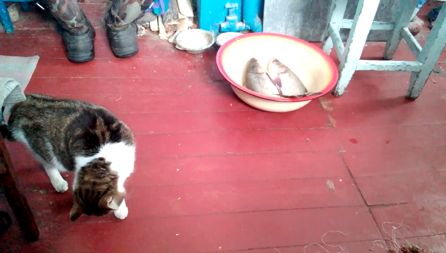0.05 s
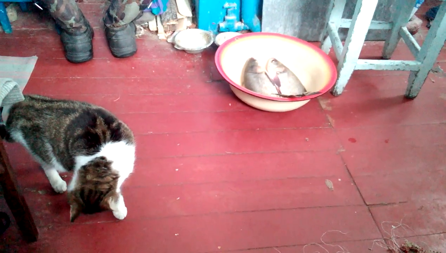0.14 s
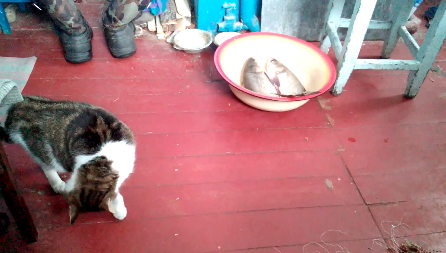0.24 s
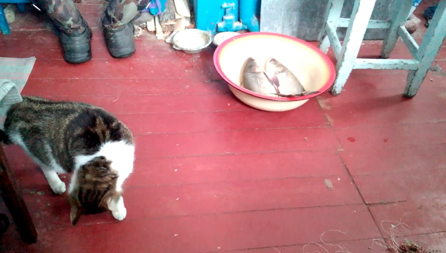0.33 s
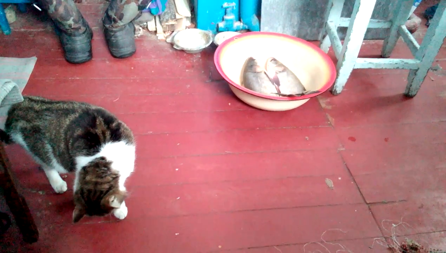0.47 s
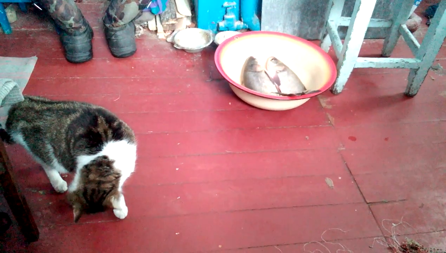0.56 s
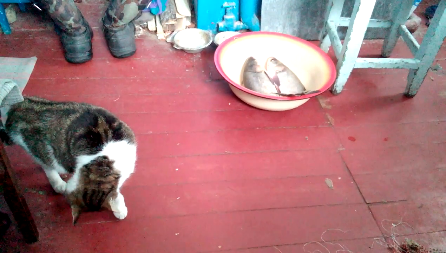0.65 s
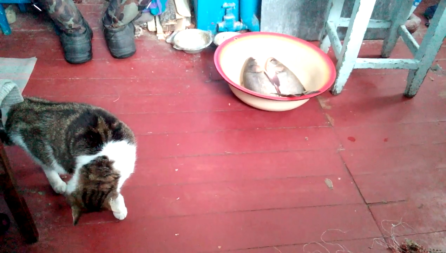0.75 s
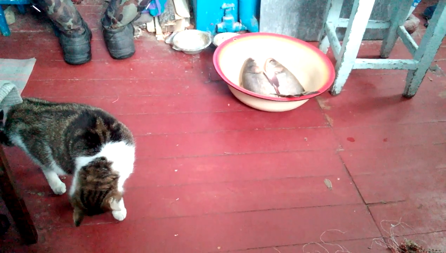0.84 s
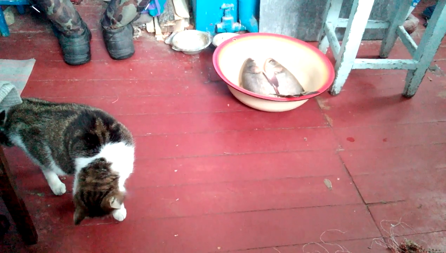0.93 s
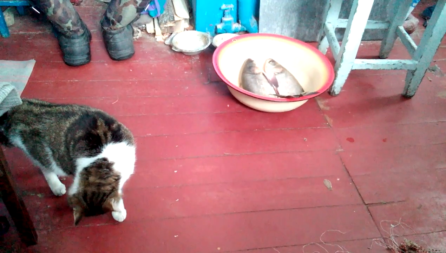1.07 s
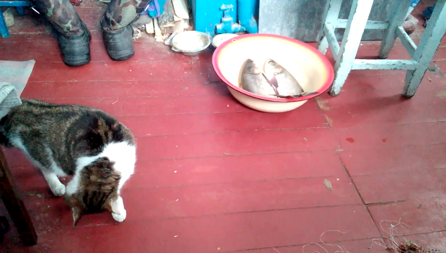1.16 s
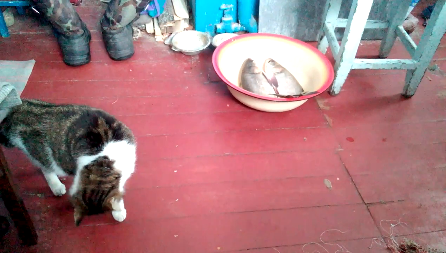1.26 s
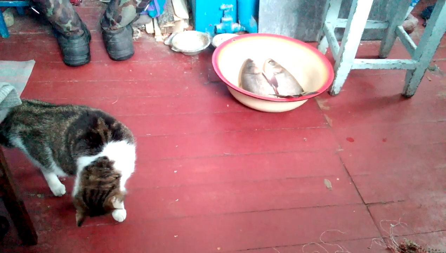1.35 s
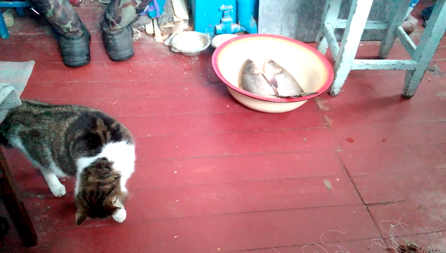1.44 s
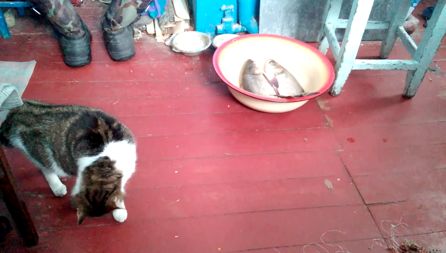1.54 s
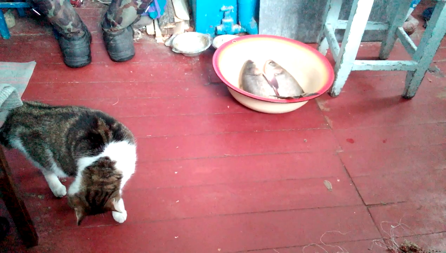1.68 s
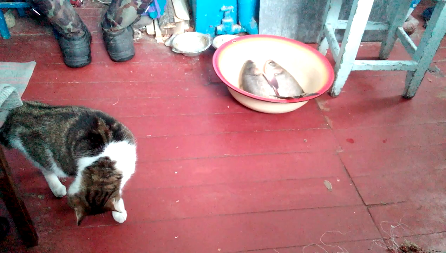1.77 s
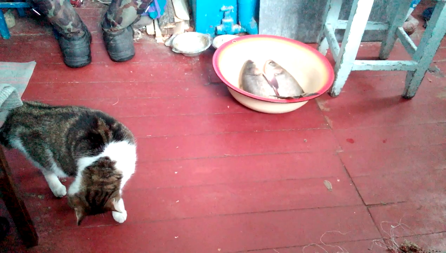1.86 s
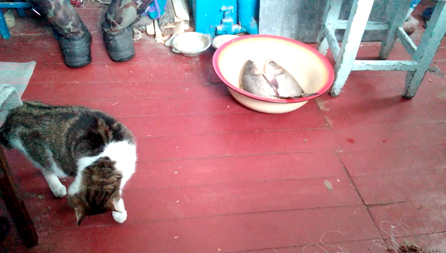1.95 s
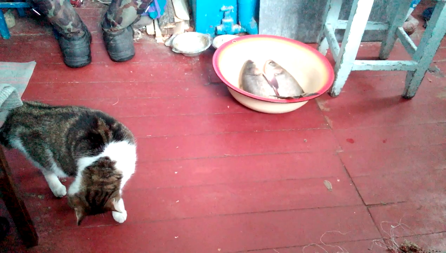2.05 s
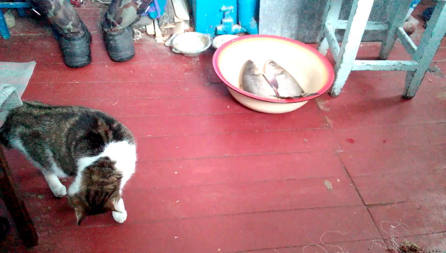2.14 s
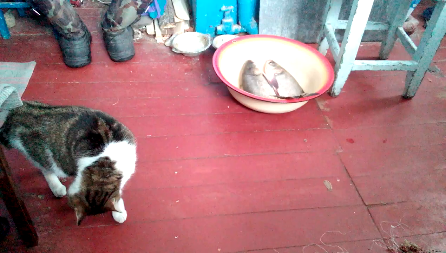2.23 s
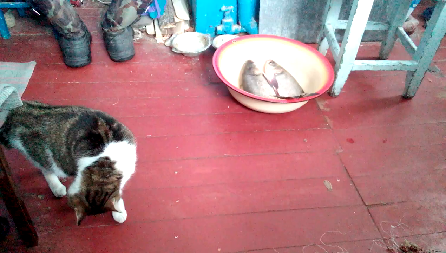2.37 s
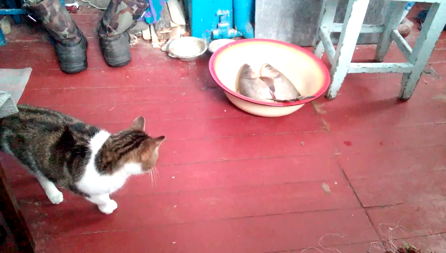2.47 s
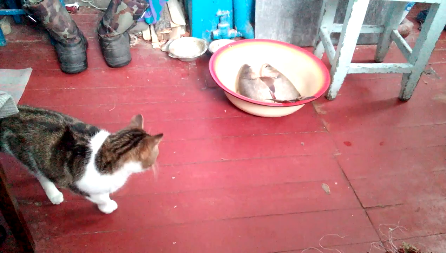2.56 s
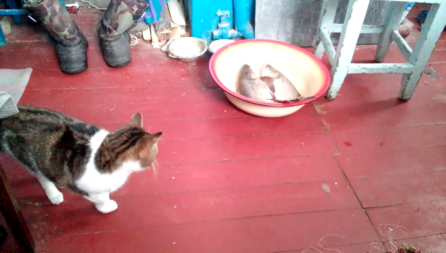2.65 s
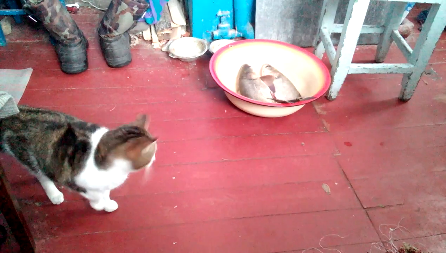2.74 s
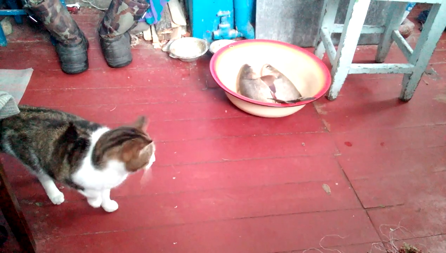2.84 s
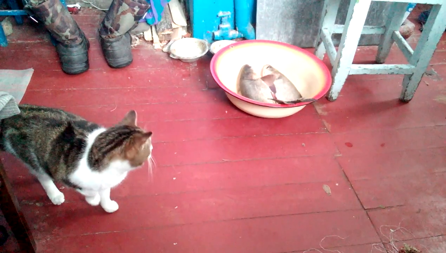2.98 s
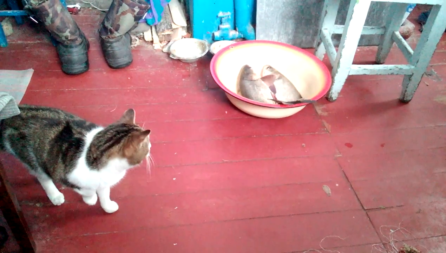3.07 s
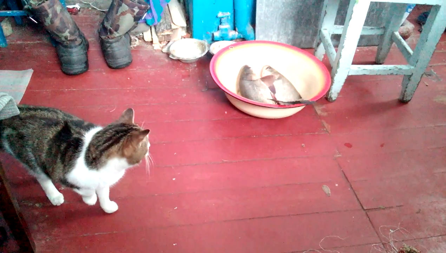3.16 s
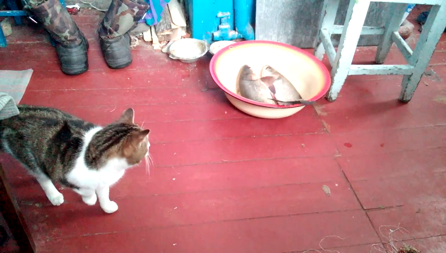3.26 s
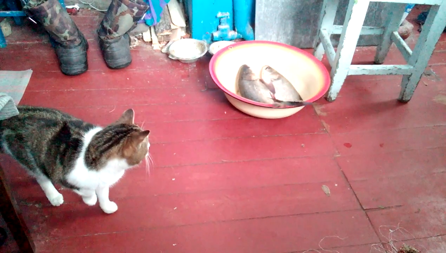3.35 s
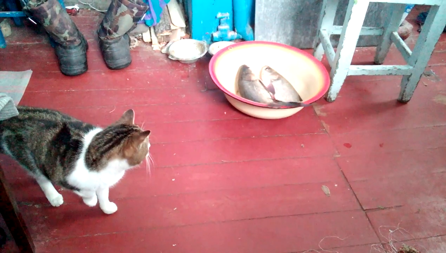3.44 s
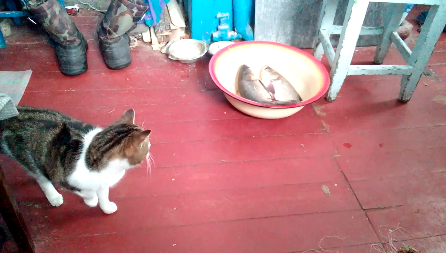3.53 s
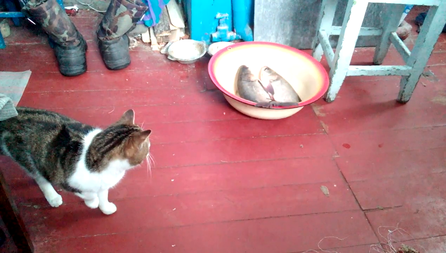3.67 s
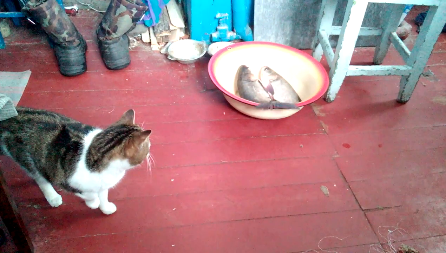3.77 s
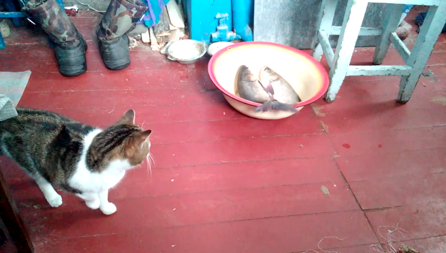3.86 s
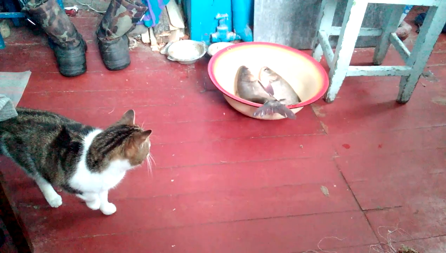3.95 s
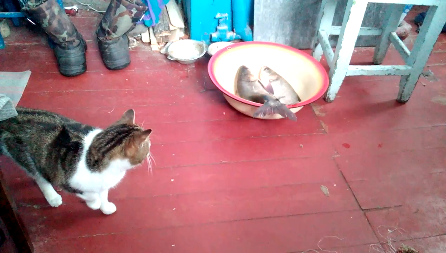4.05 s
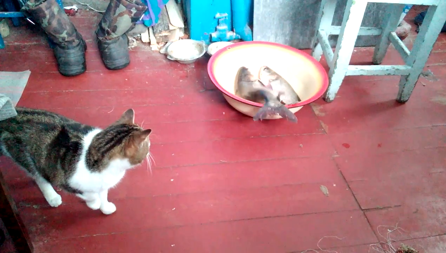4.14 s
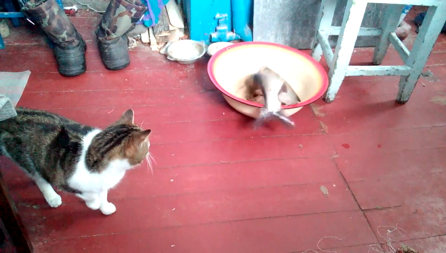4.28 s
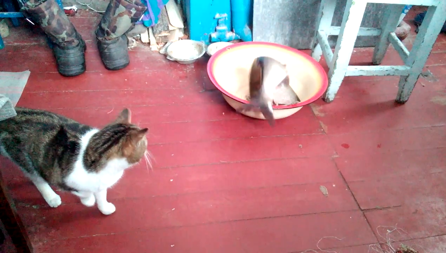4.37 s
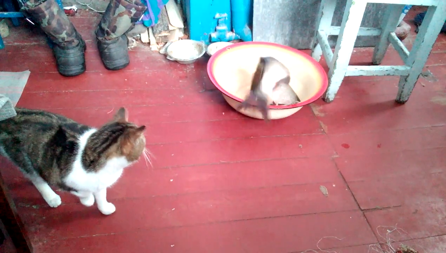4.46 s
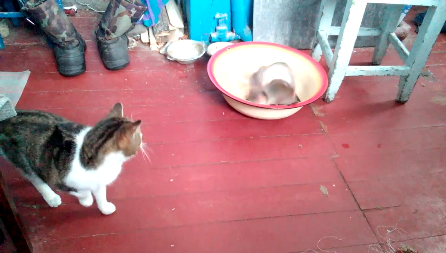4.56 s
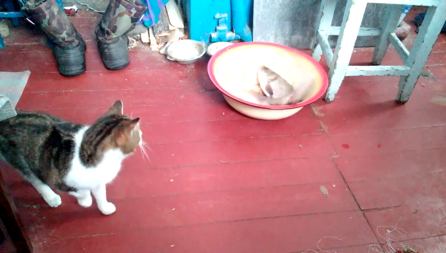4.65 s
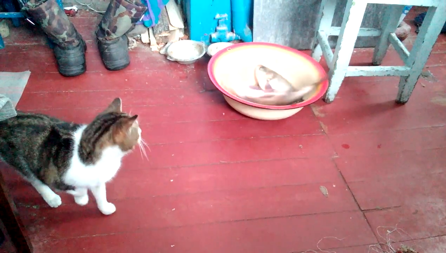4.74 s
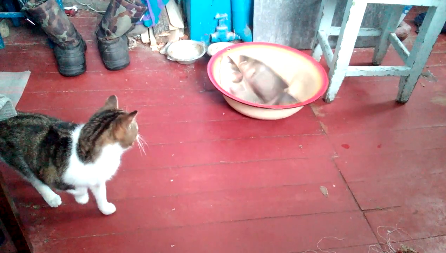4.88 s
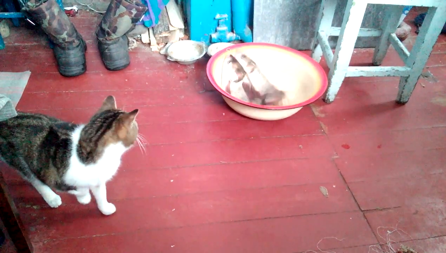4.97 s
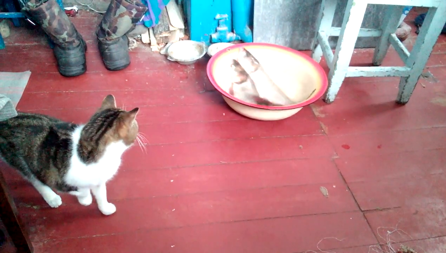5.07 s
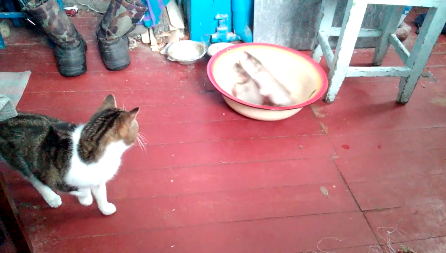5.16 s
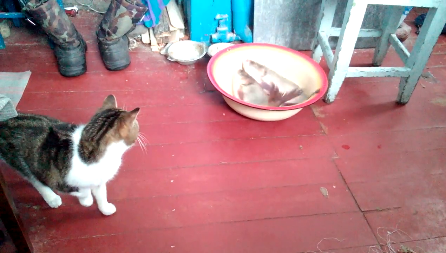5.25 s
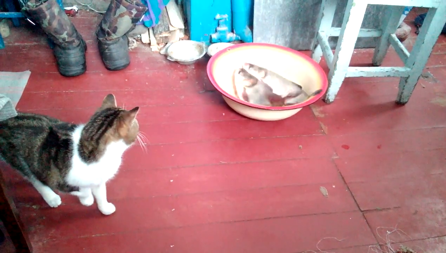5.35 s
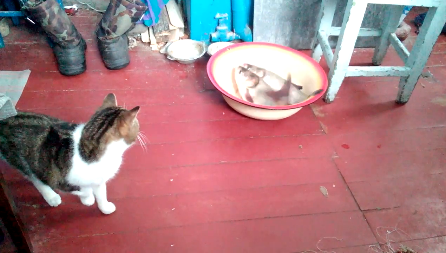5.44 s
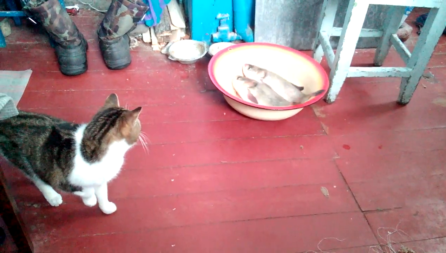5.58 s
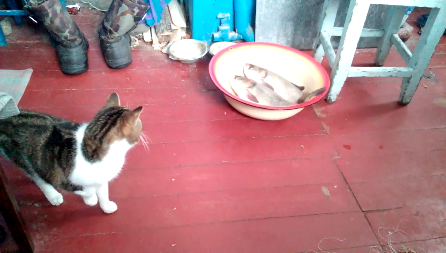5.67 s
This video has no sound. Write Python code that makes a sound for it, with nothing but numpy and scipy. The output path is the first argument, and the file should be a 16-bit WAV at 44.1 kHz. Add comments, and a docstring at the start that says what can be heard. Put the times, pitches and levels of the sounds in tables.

```python
"""Over a steady hiss in a small, quiet room, a soft rustle is followed by light hollow knocks, with a soft
step on the boards and faint ticks among them. Then come two sharp springy clicks, a switch pressed and let
go: noise bursts excite its spring's modes. Last, live fish thrash in an enamel basin on a plank floor:
bodies thump the boards (decaying sines and low noise), the basin clanks (noise through wall modes), wet
tails slap (coloured noise bursts), skin slithers (dense grains). All but hiss and board ring meet the room."""
import sys
import numpy as np
from scipy import signal
from scipy.fft import rfft, irfft, next_fast_len
from scipy.io import wavfile
from scipy.ndimage import uniform_filter1d, map_coordinates

SR = 44100
rng = np.random.default_rng(int(sys.argv[2]) if len(sys.argv) > 2 else 0)


def int16_out(signal):
    """Quantize to a 16-bit WAV file."""
    q = np.round(np.clip(np.atleast_2d(signal).T, -1, 1) * 32767)
    wavfile.write(sys.argv[1], SR, q.astype(np.int16))


N = 251807

# Spectrum of the background noise. Each row: frequency in Hz, relative density in dB per Hz.
HISS_SPECTRUM = [(15, -48), (25, -12.5), (107, -2), (199, -9), (216, -8.5), (261, -9.5), (299, -9),
                 (333, -11.5), (901, -14), (1090, -14), (1210, -14), (5200, -16), (5640, -12.5),
                 (6110, -15.5), (15700, -16.5)]
# Reverberation of the room. Each row: frequency in Hz, 60 dB decay time in seconds.
ROOM_DECAY = [(100, 0.22), (400, 0.33), (1200, 0.27), (3000, 0.27), (7000, 0.21), (14000, 0.24)]
# Light hollow knocks. Each row: start in seconds, level in dB, brightness in dB per octave,
# contact time in seconds, frequency of a thin ping in Hz, ping level in dB relative to the knock.
KNOCKS = [(0.547, -51, 2, 0.0035, 3680, -9), (0.604, -42, 1.7, 0.0032, 4900, -19),
          (1.054, -52.5, 2.5, 0.024, 3070, -13.5)]
# Modes of the hollow body. Each row: frequency in Hz, width in Hz, level in dB.
HOLLOW_MODES = [(278, 29, 3), (390, 24, -30), (555, 120, -8), (813, 103, -2.5), (1250, 190, -6),
                (1282, 27, 6), (1480, 44, -6.5), (2160, 790, -18.5), (3190, 68, -18.5), (3640, 63, -29),
                (4870, 380, -16.5), (6000, 560, -25.5), (7320, 640, -23.5), (9150, 650, -32)]
# Faint taps and bumps. Each row: start in seconds, level in dB, centre frequency in Hz.
TAPS = [(0.902, -57.5, 258), (0.927, -55.5, 215), (2.415, -70, 940), (2.539, -66.5, 780), (2.665, -68, 770)]
# Strokes of the switch. Each row: start in seconds, level in dB, stroke (0 press, 1 release),
# contact time in seconds.
CLICKS = [(0.897, -68, 0, 0.003), (2.414, -66.5, 0, 0.0061), (2.8815, -32.5, 0, 0.0013),
          (3.1511, -32, 1, 0.0018)]
# Modes of spring and lever. Each row: frequency in Hz, width in Hz, press level in dB, release level in dB.
SPRING_MODES = [(232, 28, -8.5, -2.5), (285, 32, -1, -4.5), (394, 42, -10.5, -15.5), (684, 35, -11.5, -16),
                (960, 75, -0.5, -9.5), (1234, 150, -9, -11.5), (1370, 100, -7, -7.5), (2030, 30, -4, -7.5),
                (2366, 100, -7, -16), (2576, 26, -26, -4), (3510, 16, 8, 0), (3270, 430, -11.5, -9),
                (4290, 210, -28, -3.5), (5100, 120, -4.5, -24), (5320, 29, 11, -11), (5380, 112, -9, 8.5),
                (6060, 350, -11, -8), (6980, 70, -9.5, 3), (7470, 53, -1, 10), (8180, 67, -3.5, -4),
                (8800, 150, -9, -9.5), (9660, 37, -4, -7.5), (11660, 600, -16.5, -17.5),
                (12980, 80, -12.5, -16), (13820, 80, -14, -25)]
# Faint rustling and sliding: a soft early rustle, then wet skin over enamel.
# Each row: start in seconds, length in seconds, level in dB.
SLIDES = [(0.206, .33, -73), (4.262, 0.098, -67), (4.476, 0.15, -69), (4.762, 0.088, -57.5),
          (4.932, .32, -62)]
# Colour shared by smacks and sliding. Each row: frequency in Hz, relative density in dB per Hz.
SMACK_COLOUR = [(880, -19), (1500, 2.5), (1640, -5), (2110, -11.5), (2330, -7.5), (2540, -10), (2890, -3),
                (3380, -9.5), (4100, -5.5), (5890, -9.5), (8540, -8), (10800, -15.5), (15500, -19)]
# Blows on the basin wall. Each row: start in seconds, level in dB, contact time in seconds,
# frequency in Hz above which the blow rolls off.
CLANKS = [(4.234, -74, 0.0048, 1800), (4.61, -62, 0.0077, 2000), (4.629, -49.5, 0.01, 1210),
          (4.72, -38.5, .011, 1900), (4.948, -49, .012, 1500), (4.986, -47.5, .012, 1270),
          (5.187, -36.5, .0065, 1050), (5.628, -57.5, .004, 1200)]
# Modes of the enamel basin, damped by the fish. Each row: frequency in Hz, width in Hz, level in dB.
BASIN_MODES = [(231, 35, 6.5), (407, 98, -4), (567, 100, -9.5), (687, 62, -1), (880, 190, -10),
               (1066, 49, 0.5), (1317, 49, -1), (1476, 42, -8)]
# Short noisy smacks: faint early ticks, then wet tails and fins. Each row: start in seconds, level in dB,
# centre frequency in Hz, width in octaves, length in seconds, frequency of the pop in Hz,
# level of the pop in dB relative to the smack.
SMACKS = [(0.897, -66.5, 7400, .5, 0.0048, 8000, -9), (1.242, -62.5, 6400, 0.22, 0.0083, 6200, -5),
          (4.278, -65, 4600, 0.41, .018, 4000, -4), (4.521, -63.5, 4000, 0.4, .0084, 4280, -3),
          (4.609, -47.5, 3820, 0.73, .011, 4100, -3.5), (4.72, -39.5, 4950, 0.98, .0125, 3010, -2.5),
          (4.95, -46, 4060, 0.91, 0.026, 4700, -10.5), (5.105, -55, 5050, 0.44, 0.011, 4100, 4.5),
          (5.188, -52, 3100, 0.37, .0095, 3800, -3), (5.378, -68, 2490, 0.55, 0.0051, 2900, -8),
          (5.67, -66, 7700, .2, .015, 7400, -6)]
# Thumps on the boards: a soft early step, then bodies landing. Each row: start in seconds, level in dB,
# centre frequency of the push in Hz, level of the rebound in dB relative to the first touch.
THUMPS = [(0.902, -64, 85, -8), (4.341, -55.5, 119, -14), (4.511, -41, 107, -12), (4.626, -40, 116, -3),
          (4.726, -32.5, 199, -20), (4.743, -33, 205.4, -16), (4.948, -39.5, 178, 0),
          (5.185, -30.5, 176.5, -14), (5.629, -53.5, 110, 3)]
# Modes of the floorboards. Each row: frequency in Hz, level in dB, 60 dB decay time in seconds.
BOARD_MODES = [(57, 4, 0.67), (65.9, -9, 0.89), (92.6, 6, 0.37), (115.7, 2, 0.45), (142.4, -11, 0.65),
               (171.7, -1.5, 0.41), (200.5, 2.5, 0.34), (240.9, -1.5, 0.33), (263, -17, 0.18)]

HISS_DB = -64
TOP_HZ = 15850
LENGTH = 2 ** 15  # samples in one blow
T = np.arange(LENGTH) / SR  # seconds within one blow
HZ = np.fft.rfftfreq(LENGTH, 1 / SR) + 1e-3

# Knocks and taps: each knock touches again, a little brighter.
CHATTER_S, CHATTER_DB, CHATTER_TILT_DB = 0.0105, -7, 1.5  # tilt per octave
PING_WIDTH_HZ, TAP_OCTAVES = 130, 0.45
# Switch: the lever meets its stop after the snap; the mounting gives a dull thud.
STOP_S, STOP_DB = 0.0095, -7
THUD_DB, THUD_HZ = -32, 74  # level relative to the click
SLIDE_RISE_DB_PER_S, SLIDE_FALL_DB_PER_S = 155, 131
# Clanks: spectral slope gained per octave of reach, and the reach at which the slope is level.
CLANK_TILT_DB, CLANK_FLAT_HZ = 5.5, 1380
ROLL_CONTACTS, ROLL_DB = 1.8, -0.5  # second hit as the flank rolls on: delay in contact times, level
# Smacks: a pop follows just after the touch, then a spray of ticks.
POP_S, POP_OCTAVES, POP_LENGTH_S = 0.0098, 0.17, 0.003
PEEL_TICKS, PEEL_LENGTHS = 4, 4  # count; longest delay after the pop in smack lengths
PEEL_DB, PEEL_FADE_DB = -3.5, -12  # level of the earliest tick; further change across the span
TICK_S, TICK_SCATTER_OCTAVES, TICK_OCTAVES, TICK_DIRECT_DB = 0.00076, 0.39, 0.4, -1
# Thumps: the full weight follows the first touch, then a rebound, each with a slower push.
PUSH_OCTAVES = 0.5
WEIGHT_S, WEIGHT_PITCH, WEIGHT_DB = 0.0079, 0.576, -2.5
REBOUND_S, REBOUND_PITCH = 0.042, 0.614


def amp(db):
    """Level to amplitude ratio: 20 dB is a factor of ten."""
    return 10 ** (np.asarray(db) / 20)


def along(points, hz):
    """Logarithmic frequency scale: values are interpolated between (Hz, value) points."""
    f, v = np.transpose(points)
    return np.interp(np.log(hz + 1), np.log(f), v)


def loud(x, db):
    """Energy equivalence: the blow carries the energy of 30 ms at the given level."""
    return x * amp(db) / np.sqrt(np.sum(x ** 2) / (0.03 * SR) + 1e-20)


def add(track, s, x):
    """Superposition: a blow is summed into the track from time s."""
    start = min(round(s * SR), N)
    track[start:start + len(x)] += x[:N - start]


def causal(gain):
    """Minimum phase: folding the cepstrum makes a response of this gain ring only after the blow."""
    cepstrum = irfft(np.log(np.maximum(gain, 1e-6)))
    cepstrum[1:LENGTH // 2] *= 2
    cepstrum[LENGTH // 2 + 1:] = 0
    return np.exp(rfft(cepstrum))


def resonances(modes):
    """Modal superposition: resonance curves add in power, with deep valleys between them."""
    power = 0
    for centre, width, db in modes:
        off = ((HZ - centre) / width) ** 2
        power = power + amp(db) ** 2 / (1 + 4 * off) / (1 + off / 30)
    return np.sqrt(power)


def hump(hz, centre_hz, octaves):
    """Band-limited excitation: a bell curve on the log-frequency axis."""
    return np.exp(-0.5 * (np.log2(hz / centre_hz) / max(octaves, 0.15)) ** 2)


def contact(seconds, spiky_db):
    """Rough contact: a cluster of tiny impacts swells and dies within a few contact times."""
    u = T / max(seconds, 2e-4)
    grains = rng.standard_normal(LENGTH) * amp(spiky_db * rng.standard_normal(LENGTH))
    return grains * np.sqrt(u) * np.exp(-2 * u)


def in_room(force, gain, direct_db):
    """Source, body and room in series: direct sound, then separate echoes merging into reverberation."""
    hz, t, z = signal.stft(rng.standard_normal(LENGTH), SR, nperseg=256)
    decay = amp(-60 * t / along(ROOM_DECAY, hz)[:, None])
    tail = signal.istft(z * decay, SR, nperseg=256)[1][:LENGTH]
    density = np.clip(0.051 + (T / 0.035) ** 2, 0.01, 1)
    tail = tail * (rng.random(LENGTH) < density) / np.sqrt(density)
    tail /= np.linalg.norm(tail)
    tail[0] += amp(direct_db)  # direct sound, relative to the whole tail
    scattered = rfft(force) * rfft(tail)
    # contact and room only add fine ripple: the broad colour is the body's
    broad = np.sqrt(np.abs(uniform_filter1d(np.abs(scattered) ** 2, size=200)) + 1e-12)
    return irfft(scattered * causal(gain / broad))


def hiss():
    """Stationary random noise: microphone hiss and the faint rumble of the room share one spectrum."""
    hz = np.fft.rfftfreq(N, 1 / SR)
    noise = irfft(rfft(rng.standard_normal(N)) * amp(along(HISS_SPECTRUM, hz)), N)
    return amp(HISS_DB) * noise / np.std(noise)


def tap(db, centre_hz):
    """Non-resonant impact: a small touch excites one broad band with no ring."""
    touch = contact(0.004, spiky_db=2)
    return loud(in_room(touch, hump(HZ, centre_hz, TAP_OCTAVES), direct_db=-1.0), db)


def knocks():
    """Repeated impact on a hollow body: chattering knocks with thin pings, and taps with no ring."""
    track = np.zeros(N)
    body = resonances(HOLLOW_MODES)
    for s, db, tilt_db, seconds, ping_hz, ping_db in KNOCKS:
        ping_mode = resonances([(ping_hz, PING_WIDTH_HZ, 0)])
        ping = in_room(contact(seconds, spiky_db=5), ping_mode, direct_db=-7)
        add(track, s, loud(ping, db + ping_db))
        touches = [(0, 0, tilt_db), (CHATTER_S, CHATTER_DB, tilt_db + CHATTER_TILT_DB)]
        for delay, step_db, slope_db in touches:
            colour = body * amp(slope_db * np.log2((HZ + 50) / 1500))
            knock = in_room(contact(seconds, spiky_db=11), colour, direct_db=-2.5)
            add(track, s + delay, loud(knock, db + step_db))
    for s, db, centre_hz in TAPS:
        add(track, s, tap(db, centre_hz))
    return track


def switch():
    """Snap-through: the spring flips and hits its stop; press and release favour different modes."""
    track = np.zeros(N)
    for s, db, stroke, seconds in CLICKS:
        modes = [(hz, width, release if stroke > 0.5 else press)
                 for hz, width, press, release in SPRING_MODES]
        body = resonances(modes)
        for delay, step_db in [(0, 0), (STOP_S, STOP_DB)]:
            click = in_room(contact(seconds, spiky_db=3.0), body, direct_db=-6)
            add(track, s + delay, loud(click, db + step_db))
        add(track, s, tap(db + THUD_DB, THUD_HZ))
    return track


def slide():
    """Friction noise: a soft rustle, later slithering fish, as a fine, dense crackle with a dull rumble."""
    ticks = rng.standard_normal(N) * amp(5.9 * rng.standard_normal(N))

    def drag(gain):
        """Convolution: every tick excites the same response in the room."""
        response = in_room(signal.unit_impulse(LENGTH), gain, direct_db=-3)
        return signal.fftconvolve(ticks, response)[:N]

    crackle = drag(amp(along(SMACK_COLOUR, HZ)) * hump(HZ, 4400, 1.12))
    rumble = drag(hump(HZ, 86, 1.6) / np.hypot(1, (55 / HZ) ** 4))
    t = np.arange(N) / SR
    efforts_db = []
    for s, seconds, db in SLIDES:
        rise_db = SLIDE_RISE_DB_PER_S * np.maximum(s - t, 0)
        fall_db = SLIDE_FALL_DB_PER_S * np.maximum(t - s - seconds, 0)
        efforts_db.append(db - rise_db - fall_db)
    effort = amp(np.max(efforts_db, axis=0))  # the strongest slide prevails
    return effort * (crackle / np.std(crackle) + amp(0.5) * rumble / np.std(rumble))


def clanks():
    """Contact stiffness: the wall rings twice as the flank rolls on; soft flesh leaves out high modes."""
    track = np.zeros(N)
    wall = resonances(BASIN_MODES) / np.hypot(1, (170 / HZ) ** 2)
    for s, db, seconds, reach_hz in CLANKS:
        tilt_db = CLANK_TILT_DB * np.log2(reach_hz / CLANK_FLAT_HZ)
        hardness = amp(tilt_db * np.log2(HZ / 700)) / np.hypot(1, (HZ / reach_hz) ** 5)
        for delay, step_db in [(0, 0), (ROLL_CONTACTS * seconds, ROLL_DB)]:
            clank = in_room(contact(seconds, spiky_db=5.0), wall * hardness, direct_db=-5.5)
            add(track, s + delay, loud(clank, db + step_db))
    return track


def smack(db, centre_hz, octaves, seconds, direct_db):
    """Random resonance: each short touch has its own uneven spectrum, as air pockets under wet skin give."""
    pockets = map_coordinates(rng.standard_normal(200), [HZ / 230])
    band = hump(HZ, centre_hz, octaves) + amp(-23)
    colour = amp(along(SMACK_COLOUR, HZ) + 2.7 * pockets) * band
    return loud(in_room(contact(seconds, spiky_db=5), colour, direct_db), db)


def smacks():
    """Adhesion and release: faint ticks, then wet slaps whose trapped air pops and skin peels off in ticks."""
    track = np.zeros(N)
    for s, db, centre_hz, octaves, seconds, pop_hz, pop_db in SMACKS:
        add(track, s, smack(db, centre_hz, octaves, seconds, direct_db=-6.0))
        pop = smack(db + pop_db, pop_hz, POP_OCTAVES, POP_LENGTH_S, direct_db=2.5)
        add(track, s + POP_S, pop)
        for share in rng.random(size=PEEL_TICKS):
            tick_hz = centre_hz * 2 ** rng.normal(0, TICK_SCATTER_OCTAVES)
            tick_db = db + PEEL_DB + PEEL_FADE_DB * share
            tick = smack(tick_db, tick_hz, TICK_OCTAVES, TICK_S, TICK_DIRECT_DB)
            add(track, s + POP_S + share * PEEL_LENGTHS * seconds, tick)
    return track


def thumps():
    """Modal excitation: a soft step, then landing bodies; slower pushes wake lower board modes."""
    track = np.zeros(N)
    soft = 1 / np.hypot(1, (HZ / 290) ** 6)
    for s, first_db, push_hz, rebound_db in THUMPS:
        pushes = [(0, 0, 1), (WEIGHT_S, WEIGHT_DB, WEIGHT_PITCH), (REBOUND_S, rebound_db, REBOUND_PITCH)]
        for delay, step_db, pitch in pushes:
            db = first_db + step_db
            centre_hz = push_hz * pitch
            ring = 0
            for k, (hz, level, t60) in enumerate(BOARD_MODES):
                decay = amp(level + rng.normal(0, 1) - 60 * T / t60)
                strength = hump(hz, centre_hz, PUSH_OCTAVES) * decay
                mode_hz = hz * (1 + rng.normal(0, 0.012))
                ring = ring + (-1) ** k * strength * np.sin(2 * np.pi * mode_hz * T)
            ring = ring * (1 - np.exp(-T / 0.0015))  # soft onset
            push = hump(HZ, centre_hz, 0.77 * PUSH_OCTAVES) * soft
            boom = in_room(contact(0.0072, spiky_db=-3.0), push, direct_db=-3.5)
            add(track, s + delay, loud(ring, db) + loud(boom, db - 1.5))
    return track


def scene():
    """Superposition at one microphone; the boards radiate little below their lowest mode."""
    lowest_hz = 47
    highpass = signal.butter(4, lowest_hz, "high", fs=SR, output="sos")
    floor = signal.sosfilt(highpass, thumps())
    return (hiss() + knocks() + switch() + slide() + clanks() + smacks() + floor)[None]


def record(dry):
    """Band limitation: nothing above the top frequency is passed."""
    size = next_fast_len(N + LENGTH)
    passed = np.fft.rfftfreq(size, 1 / SR) < TOP_HZ
    return irfft(rfft(dry, size) * passed, size)[:, :N]


dry = scene()
out = record(dry)
int16_out(out)
```